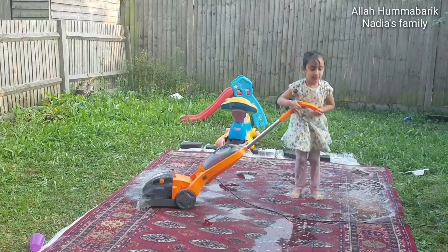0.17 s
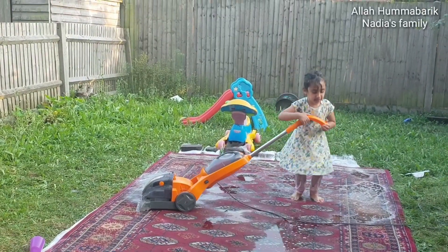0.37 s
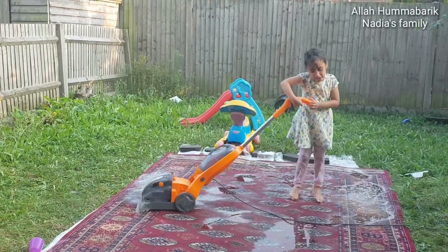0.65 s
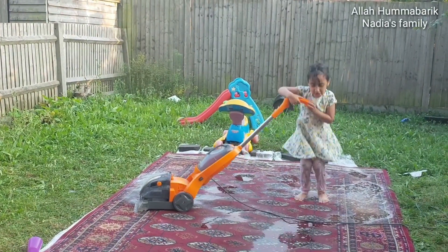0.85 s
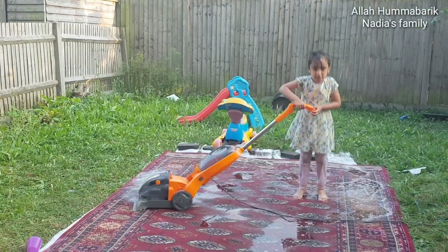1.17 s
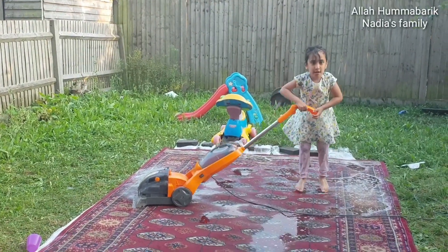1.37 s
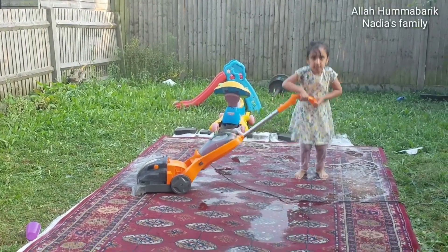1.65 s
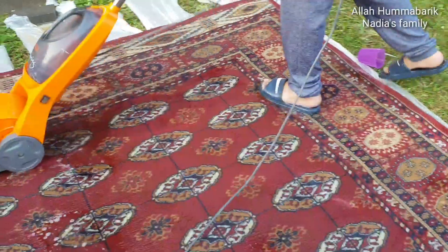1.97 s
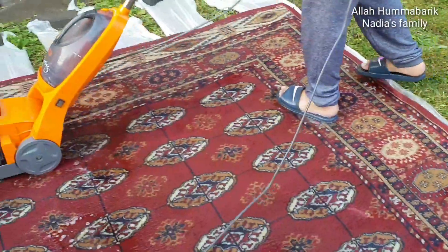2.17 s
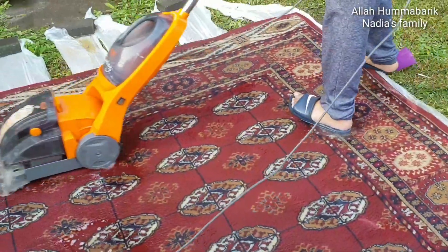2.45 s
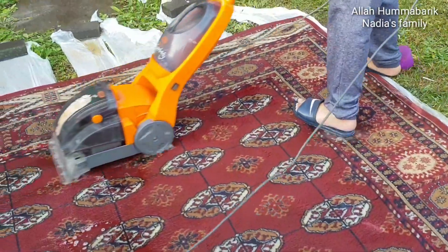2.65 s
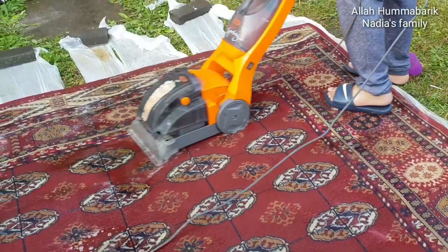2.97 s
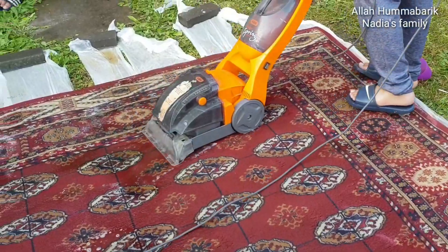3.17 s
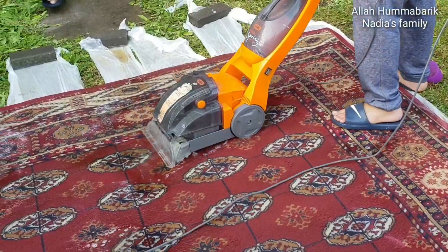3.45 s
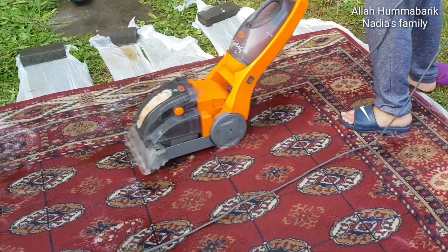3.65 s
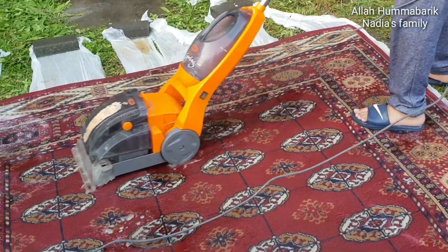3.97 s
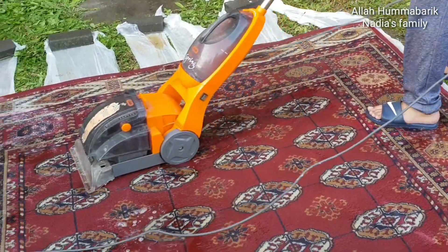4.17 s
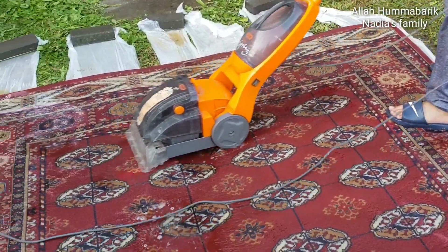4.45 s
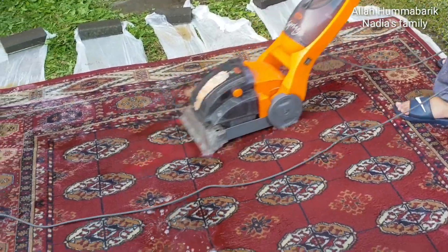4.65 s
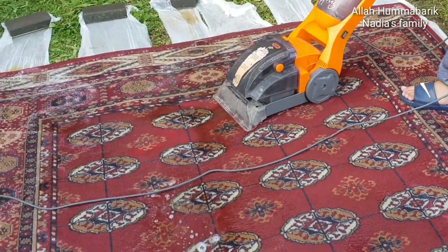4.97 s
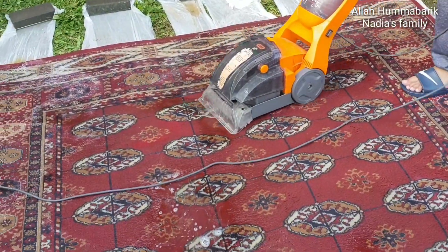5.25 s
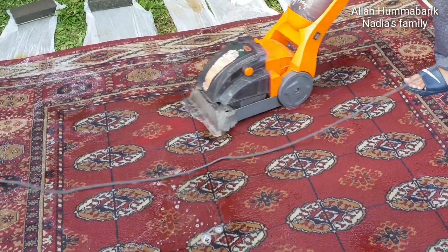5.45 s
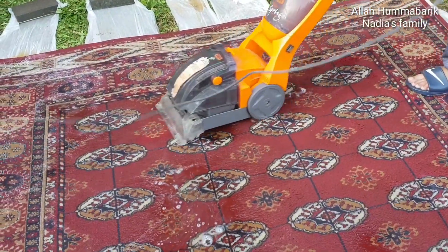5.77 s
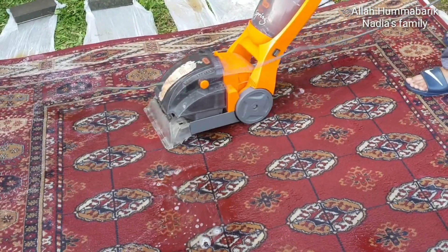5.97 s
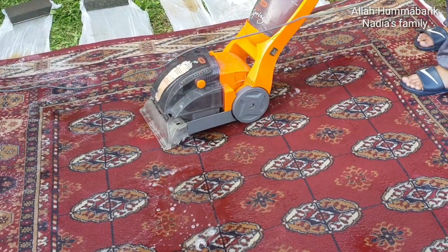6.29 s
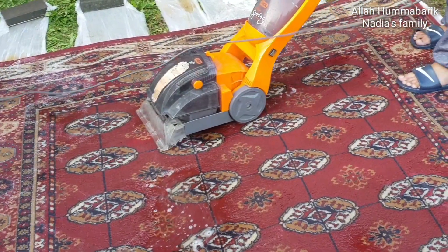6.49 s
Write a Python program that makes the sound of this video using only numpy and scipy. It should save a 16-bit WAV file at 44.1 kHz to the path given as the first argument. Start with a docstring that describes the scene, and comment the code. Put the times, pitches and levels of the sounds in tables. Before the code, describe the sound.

An upright carpet washer drones with a steady motor hum, high fan whine and airy suction hiss, then suddenly is heard close up outdoors.

```python
"""Carpet washer on a wet rug

An upright carpet washer runs in a garden, heard from across the lawn, then suddenly from close by.
Sines locked to one shaft angle give motor hum, seven-blade fan whine, commutator whistle and overtones.
Filtered noise gives the air roar and hiss; the brush roll pulses in both.
As the machine is pushed to and fro, the tones swell, fade and shift between two microphones."""
import sys
import numpy as np
from scipy import signal
from scipy.fft import rfft, irfft, next_fast_len
from scipy.io import wavfile
from scipy.ndimage import map_coordinates

SR = 44100
rng = np.random.default_rng(int(sys.argv[2]) if len(sys.argv) > 2 else 0)


def put_to_file(sound):
    """Save the sound as 16-bit audio at rate SR, in the file named by the first command-line argument."""
    columns = np.atleast_2d(sound).T  # one column per channel
    safe = np.clip(columns, -1, 1)
    whole_steps = np.round(safe * 32767)
    wavfile.write(sys.argv[1], SR, whole_steps.astype(np.int16))


N = 291942
T = np.arange(N) / SR
CLOSE_S = 2.567
CLOSE = T >= CLOSE_S
TOP_HZ = 15450

FAR_SHAFT_HZ, CLOSE_SHAFT_HZ, SAG_HZ_PER_S = 451.3, 450.1, 0.14
PHASE_JUMP_RAD = 1.965  # fixed jump of the shaft angle where the close spot begins
BLADES, BARS = 7, 12
BRUSH_HZ, BRUSH_SCATTER = 40.9, 0.148  # beats on the pile; relative rms spread of their rate
THROB = 0.55  # overall brush throb, scales the shares in STRONG

# Shaft hum, high on the push and low on the draw: (time [s], level [dB])
HUM_LEVEL = [(0, -29), (0.45, -31.5), (0.7, -29.5), (1.1, -31.5), (1.45, -29), (1.95, -29), (2.17, -31),
             (2.6, -29.5), (2.79, -30), (2.92, -34.5), (3.1, -35.5), (3.65, -33.5), (3.87, -27.5),
             (4.1, -28), (4.33, -28.5), (4.62, -28), (4.88, -35), (5.02, -33.5), (5.28, -30.5), (5.5, -29),
             (6, -27.5), (6.6, -30)]
# Octave of the hum: (time [s], level [dB])
OCTAVE_LEVEL = [(0, -52.5), (.5, -52), (.95, -55), (1.17, -60), (1.3, -49.5), (1.61, -52), (1.72, -62),
                (1.92, -51), (2.17, -57), (2.33, -60), (2.55, -55), (2.6, -49), (2.84, -46.5),
                (2.92, -57.5), (3.27, -53.5), (3.42, -62), (3.72, -55.5), (3.86, -47), (4.05, -52),
                (4.3, -51), (4.45, -54.5), (4.77, -48), (4.88, -56), (5.3, -58), (5.5, -52.5), (6.3, -52),
                (6.6, -50)]
# Hum between the microphones: (time [s], left minus right [dB], left lead [rad])
HUM_PAN = [(0, 0, 0.23), (1.2, -.8, .38), (2.55, -1.9, 0.27), (2.6, 0, 0), (2.72, 0.5, -.1),
           (2.92, 3, -0.74), (3.12, 1.5, -1.35), (3.68, 2.7, -0.6), (3.96, 0, 0), (4.46, 0, 0),
           (4.73, 4.3, -0.35), (4.91, 4.4, -1), (5.5, 3.3, -.4), (5.86, .8, -.2), (6.6, 1, -.17)]
# Blade whine at each microphone, far spot: (time [s], left [dB], right [dB])
WHINE_FAR = [(0, -55, -45), (0.26, -78, -49), (0.57, -42, -41), (0.74, -72, -56), (0.85, -55, -45.5),
             (1.13, -65, -50), (1.18, -53, -42.5), (1.35, -53, -44), (1.6, -51, -45.5), (1.72, -44, -42.5),
             (2.05, -52, -45.5), (2.22, -43.5, -38.5), (2.54, -43.5, -41)]
# Blade whine at each microphone, close spot: (time [s], left [dB], right [dB])
WHINE_CLOSE = [(2.567, -50, -50), (2.578, -45, -47), (2.59, -31, -29), (2.645, -46, -50), (2.68, -44, -42),
               (2.74, -60, -46), (2.8, -46, -42), (2.85, -54, -45), (2.92, -36, -31.5), (3.06, -44, -37.5),
               (3.2, -50, -38), (3.3, -63, -46), (3.34, -47, -36.5), (3.48, -38, -37), (3.64, -44, -37),
               (3.68, -63, -44), (3.9, -50, -42), (4.08, -43, -38), (4.2, -47, -40), (4.32, -61, -42),
               (4.45, -66, -46), (4.52, -42, -37), (4.61, -46, -40), (4.75, -36.5, -30.5),
               (4.81, -42, -33.5), (5.04, -46, -38.5), (5.29, -56, -41), (5.39, -39.5, -33),
               (5.65, -41, -33.5), (5.7, -51, -38), (5.92, -38, -37.5), (6.13, -40.5, -36.5),
               (6.3, -43, -38), (6.6, -39.5, -35.5)]
# Blade whine phase between the microphones: (time [s], left lead [rad])
WHINE_LEAD = [(0, 4.5), (1.3, 3), (1.75, 1.64), (2.56, 1.5), (2.572, 3.5), (2.6, 2.4), (2.64, 3.1),
              (2.68, 1.5), (2.74, 2.5), (2.79, 0.5), (2.86, 1.5), (2.95, 2.5), (3.02, 0.1), (3.12, 2.5),
              (3.24, 1.5), (3.31, -1.2), (3.58, 1), (3.87, -2.5), (4.3, -3), (4.42, -0.2), (4.68, 1.4),
              (4.77, -0.3), (5.03, 0.1), (5.24, 2.5), (5.4, -1), (5.62, 1.7), (5.87, 5.5), (6.35, 6.5),
              (6.6, 6.5)]
# Commutator whistle: (time [s], level [dB], left lead [rad])
WHISTLE = [(0, -62, 1.8), (.6, -61.5, 1.7), (0.87, -57, 2.3), (1.08, -59, 1.5), (1.35, -59.5, 1.2),
           (1.72, -73, 1.1), (1.9, -59, 0.7), (2.36, -63, 0.6), (2.52, -57, 0.5), (2.68, -71, 0.87),
           (2.92, -58.5, 1.3), (3.05, -62, 1.2), (3.25, -60, 1), (3.58, -57, 0.88), (3.85, -66, 1),
           (4.2, -60, 0.99), (4.55, -57.5, 1.2), (4.77, -63, 1.9), (5.02, -50, 2.3), (5.19, -62, 2.3),
           (5.33, -54, 2.5), (5.47, -59, 2), (5.6, -54.5, 1.2), (5.76, -60, 2.2), (5.9, -65, 1.6),
           (6.1, -60, 1.2), (6.6, -65, 1.6)]
# Third shaft multiple, reinforced by the tank, before trim: (time [s], level [dB])
THIRD = [(0, -56), (1.6, -54.5), (2.55, -55.5), (2.6, -49.5), (2.95, -47.5), (3.1, -53), (3.35, -53),
         (3.5, -45.5), (3.9, -42), (4.25, -47), (4.5, -49.5), (4.85, -54.5), (5.1, -44.5), (5.35, -46),
         (5.6, -42.5), (5.72, -44), (6.2, -43.5), (6.6, -47)]
# Fifth shaft multiple, before trim: (time [s], level [dB])
FIFTH = [(0, -65), (2.76, -65), (2.83, -43.5), (2.92, -52), (3.03, -44), (3.45, -46), (3.65, -57),
         (3.82, -67), (3.98, -44), (4.27, -54), (4.55, -56), (4.68, -44.5), (5.1, -50.5), (5.55, -46),
         (5.9, -55), (6.3, -49), (6.6, -46)]
# Sixth shaft multiple, before trim: (time [s], level [dB])
SIXTH = [(0, -56.5), (1.1, -52.5), (1.6, -63), (2.55, -61), (2.72, -50), (3.1, -58), (3.6, -55), (3.9, -45),
         (4.07, -60), (4.25, -47), (4.56, -47), (4.68, -59), (4.9, -50), (5.3, -56), (5.9, -50),
         (6.3, -46.5), (6.6, -45)]
# Strong shaft multiples: (multiple [-], level curve [table], share of brush throb [-])
STRONG = [(3, THIRD, 0.43), (5, FIFTH, 0.26), (6, SIXTH, .4)]
# Weak shaft multiples, before trim; multiples get rounded: (multiple [-], far [dB], close [dB])
WEAK = [(4, -59.5, -63), (7.96, -80.5, -64.5), (9, -67.5, -63), (10, -67, -79), (11, -73, -69),
        (13, -72, -71), (14, -66.5, -71), (15, -75, -74), (16, -84, -73), (21, -76, -78), (22, -74.5, -72),
        (23, -78, -73), (24, -77, -74)]
# Turbulence spectrum before resonances: (frequency [Hz], far [dB per Hz], close [dB per Hz])
AIR_SPECTRUM = [(30, -102, -105), (70, -92, -95), (148, -85.5, -89), (280, -79, -75.5), (620, -79, -77.5),
                (1064, -82.5, -80), (1585, -78.5, -67), (2530, -81, -76), (3320, -80.5, -78),
                (4890, -97, -88), (6960, -93, -90.5), (9100, -90, -87.5), (11430, -99.5, -99),
                (14900, -106, -106)]
# Housing, tank and duct resonances: (centre [Hz], width [Hz], far change [dB], close change [dB])
DUCTS = [(313, 24, 7.5, -1), (1030, 240, 8, 2.5), (1263, 235, -5.5, 6), (1324, 69, 3.5, 2),
         (1524, 60, 3, 0), (1660, 43, 9.5, 1.5), (1927, 104, 9, 0), (2000, 84, 0, 6.5), (2220, 50, 8, 5.5),
         (2566, 170, 9, 6), (3140, 210, 6, -0.5), (3560, 150, 1.5, 2.5), (4040, 130, 1.5, 3.5),
         (4370, 64, 11.5, 1), (4570, 70, 4, -0.5), (4660, 350, -0.5, 3), (6040, 180, 3, 8.5),
         (7520, 110, 7, 6)]
# Antiresonances between them, mostly dips: (centre [Hz], width [Hz], far change [dB], close change [dB])
NOTCHES = [(586, 69, -7, -2.5), (1193, 290, -1.5, -5), (1825, 430, -3.5, -9.5), (3030, 220, -8.5, -1.5),
           (5300, 1300, 6.5, -4)]
# Microphone pair: (frequency [Hz], far likeness [0-1], close likeness [0-1], left minus right [dB])
MICROPHONES = [(60, 0.88, 1, 0.5), (312, 0.98, 0.95, 0.6), (670, 0.55, 0.94, 0), (1100, 0.3, 0.35, 0),
               (1400, 0, 0.73, -3), (1920, 0.56, 0.55, -1.5), (2670, 0.98, 0.82, -4), (3080, 0, 0.4, 2.5),
               (4200, 0, 0.55, -1.5), (5300, 0.1, 0.23, -0.5), (7450, 0.17, 0.8, -2),
               (9500, 0.48, 0.32, -1.5), (13900, 0, 0, -1.5)]
# Air bands, rumble to hiss:
# (centre [Hz], hum swell [dB per dB], rush swell [dB per dB], brush pulsing [dB])
AIR_BANDS = [(470, 0.06, 0, 0), (1330, 0.38, -0.07, 0.6), (2370, 0.25, 0.3, -0.5), (4300, 0, 0.45, 1),
             (7000, -0.01, -0.06, 0)]
# Exhaust rush, used relative to its mean at each spot: (time [s], level [dB])
RUSH_LEVEL = [(0, -48), (2.56, -51.5), (2.6, -65), (2.78, -56), (2.98, -43), (3.5, -42), (4.15, -53.5),
              (4.7, -41), (5.3, -42.5), (5.8, -45.5), (6.6, -42.5)]
# Reflections off ground, housing, handle and fence: (delay [ms], level re direct [dB], rms wander [ms])
REFLECTIONS = [(1.7, -26, 0.085), (3.6, -24.5, 0.18), (6.3, -19, 0.299), (17, -14.5, 0.499)]
# Lead of the airflow at the left microphone: (time [s], lead [us])
AIR_LEAD = [(0, 28), (2.56, 37), (2.75, 52), (3.0, 7), (3.55, 6), (3.9, 40), (4.5, 22), (4.7, -18),
            (4.9, -61), (5.3, -52), (5.7, -29), (6, 0), (6.6, -7)]


def undb(db):
    """Decibels to gain."""
    return 10 ** (np.asarray(db) / 20)


def curves(table):
    """Columns of a timed table, one value per sample."""
    time_s, *columns = np.transpose(table)
    return [np.interp(T, time_s, column) for column in columns]


def over_hz(hz, points_hz, values):
    """Straight lines on a log-frequency axis."""
    return np.interp(np.log(hz + 1), np.log(points_hz), values)


def walk(rate_hz):
    """Smooth random motion, zero mean and unit rms, mostly below rate_hz."""
    size = next_fast_len(N)
    hz = np.arange(size // 2 + 1) * SR / size
    spectrum = rfft(rng.standard_normal(size)) / (1 + (hz / rate_hz) ** 2)
    x = irfft(spectrum, size)[:N]
    return (x - x.mean()) / x.std()


def tone(phase_rad, level_db, pan_db, lead_rad):
    """Sine of given rms level with a level and phase difference between the microphones."""
    sides = np.array([[1], [-1]]) / 2
    gain = undb(sides * pan_db)
    gain = gain / np.sqrt(np.mean(gain ** 2, axis=0))
    return np.sqrt(2) * undb(level_db) * gain * np.sin(phase_rad + sides * lead_rad)


def shaft(wobble_hz=0.32):
    """Shaft angle: the motor sags slowly and the load wobbles its speed."""
    far_hz = FAR_SHAFT_HZ - SAG_HZ_PER_S * T
    close_hz = CLOSE_SHAFT_HZ - SAG_HZ_PER_S * (T - CLOSE_S)
    hz = np.where(CLOSE, close_hz, far_hz) + wobble_hz * walk(18.6)
    return 2 * np.pi * np.cumsum(hz) / SR + PHASE_JUMP_RAD * CLOSE


def brush():
    """Angle of the brush roll, which drags unevenly on the wet pile."""
    hz = BRUSH_HZ * (1 + BRUSH_SCATTER * walk(23.3))
    return 2 * np.pi * np.cumsum(hz) / SR


def hum(angle, flutter_db=0.54, octave_flutter_db=2.4, octave_pan_db=-0.5, octave_lead_rad=0.86):
    """Rotor unbalance shakes the housing once a turn, with a weak octave; strokes swing the hum sideways."""
    (level_db,), (octave_db,) = curves(HUM_LEVEL), curves(OCTAVE_LEVEL)
    pan_db, lead_rad = curves(HUM_PAN)
    first = tone(angle, level_db + flutter_db * walk(10.4), pan_db, lead_rad)
    octave_db = octave_db + octave_flutter_db * walk(19)
    second = tone(2 * angle, octave_db, octave_pan_db + 2 * walk(1), octave_lead_rad)
    return first + second


def whine(angle, close_flutter_db=1.52, far_flutter_db=2.0, jitter_rad=0.15, sway_rad=0.14):
    """Fan blades chop the air; turbulence trembles the tone, with peaks and nulls at each microphone."""
    left_db, right_db = np.where(CLOSE, curves(WHINE_CLOSE), curves(WHINE_FAR))
    level_db = 10 * np.log10((undb(left_db) ** 2 + undb(right_db) ** 2) / 2)
    level_db = level_db + np.where(CLOSE, close_flutter_db, far_flutter_db) * walk(20)
    lead_rad, = curves(WHINE_LEAD)
    phase = BLADES * angle + jitter_rad * walk(30)
    return tone(phase, level_db, left_db - right_db, lead_rad + sway_rad * walk(7.1))


def whistle(angle, waver_db=2.0, flutter_db=2.5, jitter_rad=0.25, pan_db=-2.0, sway_rad=0.36):
    """Commutator bars pass the brushes with a thin tone that wavers as the machine moves."""
    level_db, lead_rad = curves(WHISTLE)
    level_db = level_db + waver_db * walk(12) + flutter_db * walk(90)
    phase = BARS * angle + jitter_rad * walk(70)
    return tone(phase, level_db, pan_db + walk(4.1), lead_rad + sway_rad * walk(20))


def whirr(angle, roll, trim_db=-2.0, fade_db=1.24, flutter_db=1.5, jitter_rad=0.12,
          pan_db=-1.5, lead_rad=-0.3, sway_rad=0.29):
    """Uneven blades add strong shaft multiples; a sideband one brush rate below makes each throb."""
    out = 0
    for order, table, share in STRONG:
        level_db, = curves(table)
        level_db = level_db + trim_db + fade_db * walk(8) + flutter_db * walk(80)
        phase = order * angle + rng.uniform(0, 2 * np.pi) + jitter_rad * walk(60)
        pan, lead = pan_db + walk(2.4), lead_rad + sway_rad * walk(3.5)
        out = out + tone(phase, level_db, pan, lead)
        out = out + THROB * share * tone(phase - roll, level_db, pan, lead)
    return out


def overtones(angle, trim_db=1.0, fade_db=3.0, flutter_db=3.0, jitter_rad=0.17, sway_rad=1.0):
    """Weaker shaft multiples, each fading and trembling on its own."""
    out = 0
    for order, far_db, close_db in WEAK:
        level_db = np.where(CLOSE, close_db, far_db) + trim_db
        level_db = level_db + fade_db * walk(12) + flutter_db * walk(95)
        drift = walk(4.9)  # a change of path moves balance and phase together, most for short waves
        lead_rad = min(0.18 * order, 1.7) + sway_rad * min(order / 5, 2) * drift
        phase = round(order) * angle + rng.uniform(0, 2 * np.pi) + jitter_rad * walk(70)
        out = out + tone(phase, level_db, -2 + drift, lead_rad)
    return out


def turbulence(spot):
    """Stereo spectrum of air rushing through resonant ducts, at spot 0 (far) or 1 (close)."""
    hz = np.arange(N // 2 + 1) * SR / N
    air, microphones = np.transpose(AIR_SPECTRUM), np.transpose(MICROPHONES)
    level_db = over_hz(hz, air[0], air[1 + spot])
    for centre_hz, width_hz, *change_db in DUCTS + NOTCHES:
        level_db = level_db + change_db[spot] / (1 + (2 * (hz - centre_hz) / width_hz) ** 2)
    likeness = np.clip(over_hz(hz, microphones[0], microphones[1 + spot]), -0.98, 0.98)
    pan_db = over_hz(hz, microphones[0], microphones[-1])
    sides = np.array([[1], [-1]])
    mid, side = rfft(rng.standard_normal((2, N))) * np.sqrt(SR) / 2
    pair = mid * np.sqrt(1 + likeness) + sides * side * np.sqrt(1 - likeness)
    return hz, pair * undb(level_db + sides * pan_db / 2)


def swell(table):
    """Level curve in dB relative to its mean at the present listening spot."""
    level_db, = curves(table)
    return level_db - np.where(CLOSE, level_db[CLOSE].mean(), level_db[~CLOSE].mean())


def suction(spot, heard, roll, flicker_db=1.2, flicker_hz=1500, surge_db=0.5):
    """Air bands swell with strokes and exhaust, gurgle and pulse; flicker shrinks above flicker_hz."""
    hz, spectrum = turbulence(spot)
    centres_hz = [band[0] for band in AIR_BANDS]
    stroke_db, rush_db = swell(HUM_LEVEL), swell(RUSH_LEVEL)
    out = 0
    for share, (centre_hz, by_stroke, by_rush, brush_db) in zip(np.eye(len(centres_hz)), AIR_BANDS):
        band = irfft(spectrum * over_hz(hz, centres_hz, share), N)  # bands crossfade, sum to one
        swell_db = by_stroke * stroke_db + by_rush * rush_db
        gurgle_db = flicker_db * min(flicker_hz / centre_hz, 1) * walk(61)
        pulse_db = brush_db * np.cos(roll)
        out = out + band * undb(swell_db + gurgle_db + pulse_db + surge_db * walk(22))
    return out * heard


def reflect(pair, wander_hz=0.59):
    """Short reflections with wandering paths comb the airflow with moving peaks and dips."""
    out, power = pair, 1
    for delay_ms, level_db, wander_ms in REFLECTIONS:
        late_s = (delay_ms + wander_ms * walk(wander_hz)) / 1000
        position = [(T - late_s) * SR]
        late = np.array([map_coordinates(x, position, order=3, mode="mirror") for x in pair])
        out = out + undb(level_db) * late
        power = power + undb(level_db) ** 2
    return out / np.sqrt(power)


def bearing(pair):
    """The airflow reaches the nearer microphone first."""
    lead_us, = curves(AIR_LEAD)
    shift = lead_us * SR / 1e6 / 2  # samples, half to each side
    left, right = pair
    return np.array([map_coordinates(left, [T * SR + shift], order=5, mode="mirror"),
                     map_coordinates(right, [T * SR - shift], order=5, mode="mirror")])


def scene():
    """One shaft drives all the tones; the brush roll throbs in the strong multiples and the air."""
    angle, roll = shaft(), brush()
    tones = hum(angle) + whine(angle) + whistle(angle) + whirr(angle, roll) + overtones(angle)
    air = suction(0, ~CLOSE, roll) + suction(1, CLOSE, roll)
    return tones + bearing(reflect(air))


def record(dry):
    """A steep elliptic low-pass cuts the top."""
    low_pass = signal.ellip(10, 0.1, 80, TOP_HZ, fs=SR, output="sos")
    return signal.sosfilt(low_pass, dry)


dry = scene()
out = record(dry)
put_to_file(out)
```